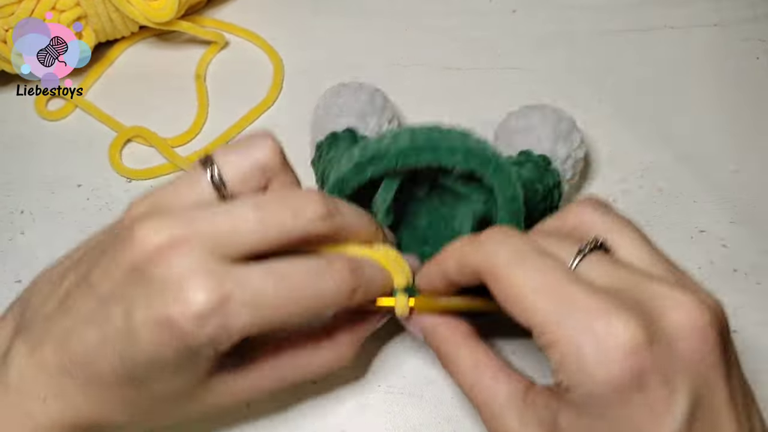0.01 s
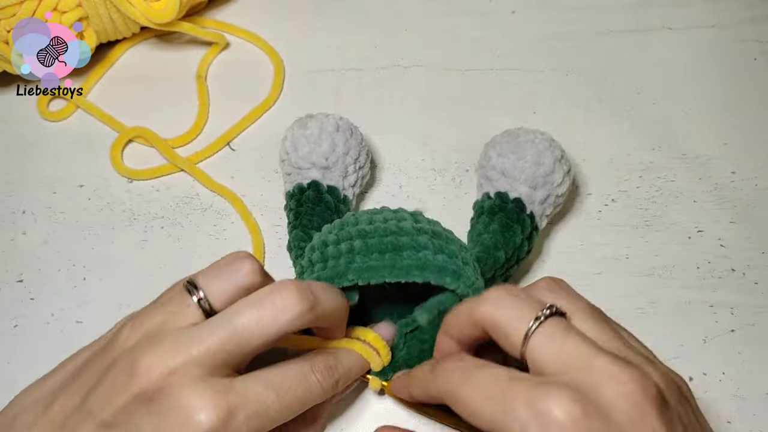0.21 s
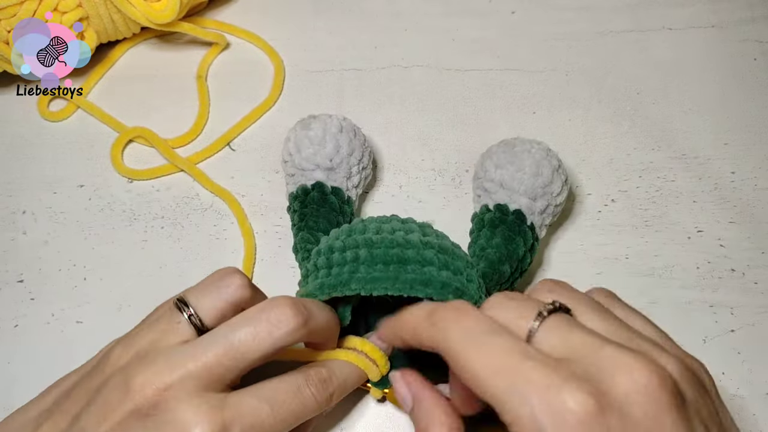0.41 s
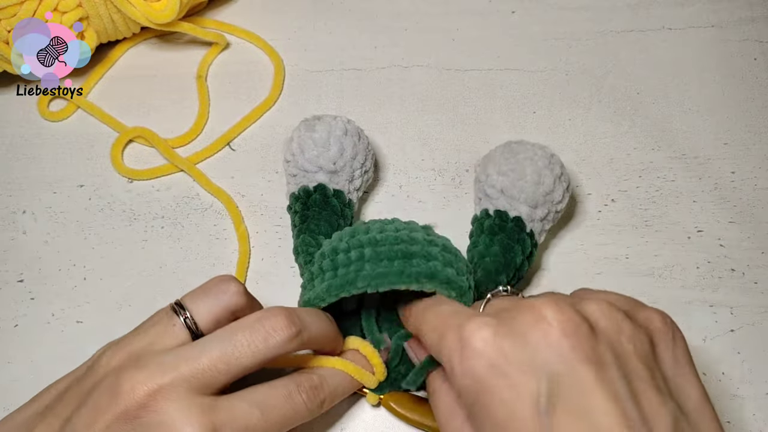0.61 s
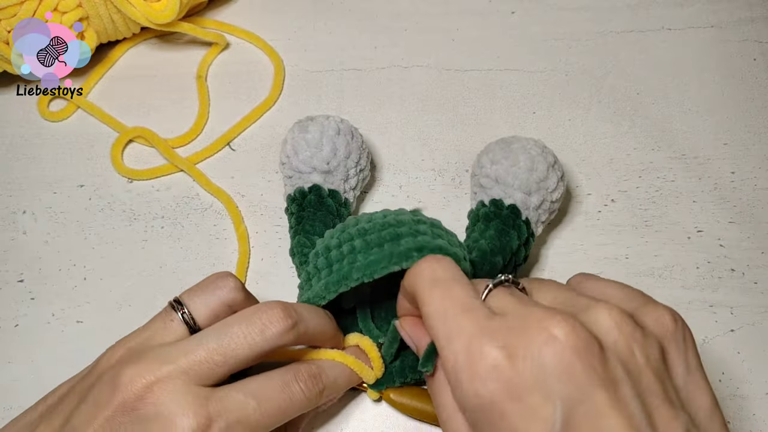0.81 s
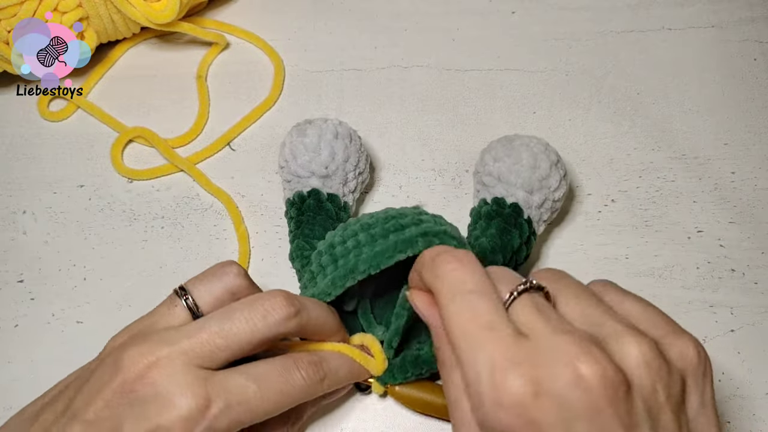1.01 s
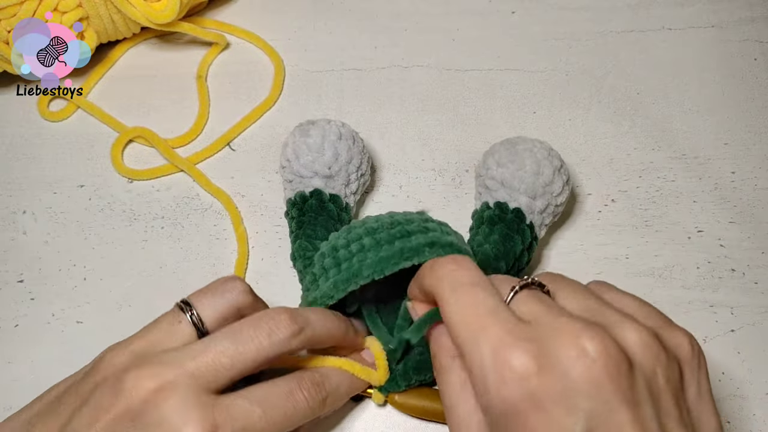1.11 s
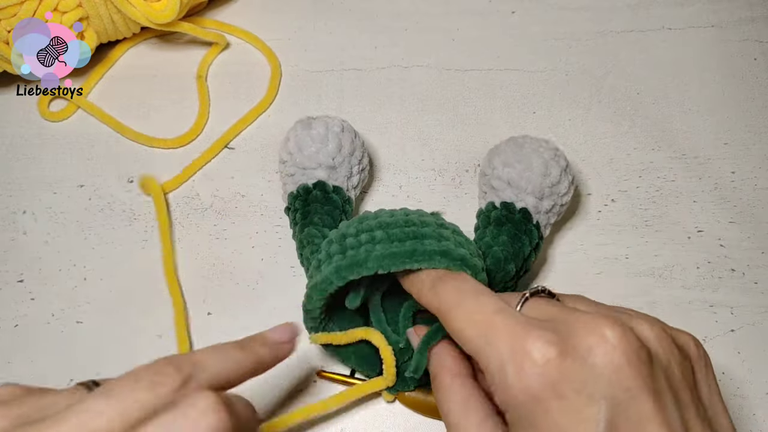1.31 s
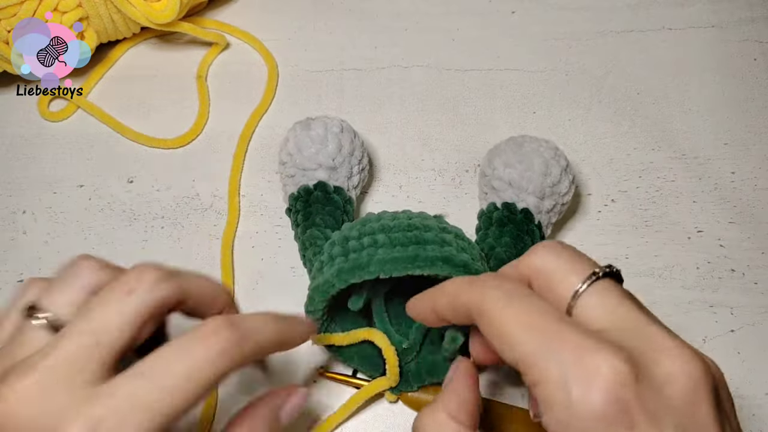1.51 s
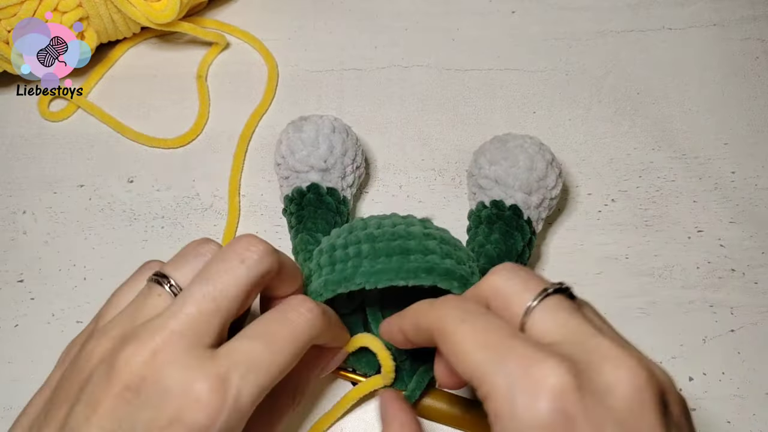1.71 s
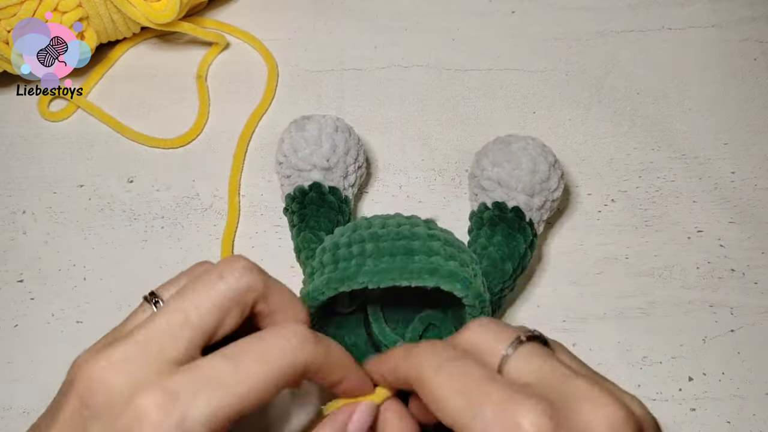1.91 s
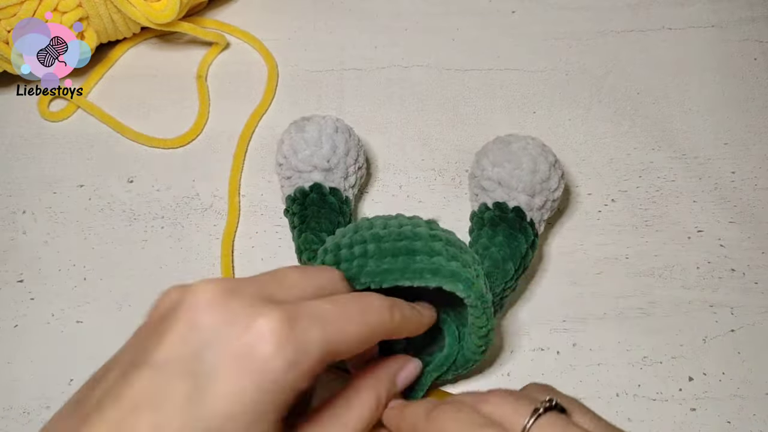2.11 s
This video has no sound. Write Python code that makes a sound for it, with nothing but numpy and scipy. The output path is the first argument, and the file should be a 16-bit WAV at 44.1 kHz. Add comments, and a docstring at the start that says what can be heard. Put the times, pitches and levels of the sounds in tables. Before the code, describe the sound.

A small crochet hook taps a table in a quiet room, miked closely in stereo. Soft low handling thuds open; at 0.24 s a loud, bright clack bounces briefly with a short room tail. Barely audible yarn rustles follow. Faint taps and a scrape come at 1.1-1.3 s, firmer knocks and clicks at 1.73-1.9 s, and a dull tiny tap near 2.07 s, over low hiss and faint hum.

```python
"""In a quiet room, a small crochet hook taps and knocks on a table among soft yarn, near a two-port microphone.
Each tap is a few milliseconds of filtered noise; decaying sines ring as low table modes and high lines in the
tail, and a diffuse noise tail answers as the room. Grainy noise bands are faint rustles, plus louder scrapes,
knocks and a tick beside the taps; low decaying sines are soft thuds of handling and table resonances around the
taps. Narrow noise bands are an appliance's hum, and coloured noise is the rumble and microphone hiss."""
import sys
import numpy as np
from scipy import signal
from scipy.fft import rfft, irfft
from scipy.io import wavfile
from scipy.ndimage import uniform_filter1d

SR = 44100
rng = np.random.default_rng(int(sys.argv[2]) if len(sys.argv) > 2 else 0)


def put_to_file(sound):
    """Save the sound as 16-bit audio at rate SR, in the file named by the first command-line argument."""
    columns = np.atleast_2d(sound).T  # one column per channel
    safe = np.clip(columns, -1, 1)
    whole_steps = np.round(safe * 32767)
    wavfile.write(sys.argv[1], SR, whole_steps.astype(np.int16))


N = 97020  # samples

# Coherence of the two ports in the room's answer and the grainy noises.
# Each row: frequency in Hz, left-right likeness (0-1).
ROOM_COHERENCE = [(60, 0.2), (130, 0.9), (290, 0.92), (640, 0.24), (1400, 0.097), (15000, 0.036)]
# Coherence of the two ports in the hiss and hum. Each row: frequency in Hz, left-right likeness (0-1).
FLOOR_COHERENCE = [(60, 0.32), (240, 0.94), (950, 0.12), (3770, 0.036), (15000, 0.36)]


def taps():
    """Impact excitation: short noise bursts, each with its own spectrum, place and room answer."""
    # Impacts. Each row: start in seconds, depth of the shared colour (0-1), ten band levels in dB,
    # left-right difference in dB, rise constant in seconds, hold in seconds, decay time T60 in seconds,
    # level of the room's answer in dB over the tap, time in seconds at which the answer's extra fade is 1 dB.
    impacts = [(.2446, 0.97, -36, -33.5, -33.5, -35.5, -30, -25.5, -17.5, -17, -16, -17.5, -0.5, 0.00067, 0.0021, 0.011, -6, 0.072),
               (1.1167, 0.9, -53, -50.5, -52, -54, -42.5, -47, -38, -38.5, -37, -44.5, 1.5, 0.0011, 0.0018, 0.033, -9, 0.049),
               (1.2293, 0.29, -46.5, -63, -48, -46, -37, -45.5, -43.5, -54, -65, -58, -2.5, 0.00094, 0.0016, 0.096, -6.5, 0.039),
               (1.2403, 0.54, -59.5, -41, -42.5, -41, -37.5, -46, -38.5, -40.5, -44, -51, 0.5, 0.00021, 0.002, 0.013, -6.5, 0.047),
               (1.7348, .8, -46.5, -49.5, -49.5, -52, -40.5, -44.5, -36, -36.5, -36.5, -38.5, 2, 0.0003, 0.003, 0.041, -6, 0.0427),
               (1.7733, 0.85, -42.5, -30.5, -32, -36.5, -29, -71.5, -29, -56, -73.5, -58, 1, 0.00076, 0.00061, 0.033, -9, 0.053),
               (1.7835, 0.24, -42.5, -42.5, -61, -37, -28.5, -25, -21.5, -22.5, -33, -34.5, -2, 0.00045, 0.0018, 0.022, -13.5, 0.051),
               (1.87, .4, -50, -65, -55, -64, -78, -60, -67, -29, -26.5, -48, 15.5, 0.00024, 0.00027, 0.0089, -32, 0.02),
               (1.8838, 0.32, -71.5, -55, -51, -67.5, -50, -50.5, -50, -48, -52, -59, 14.5, 0.00055, 0.000767, 0.004, -19, 0.072),
               (2.069, 0.76, -58.5, -56.5, -54.5, -55.5, -54.5, -72, -68, -75, -83, -82, 2.5, 0.00046, 0.0039, 0.025, -14, 0.065)]
    # Frequencies of the ten band levels, in Hz.
    bands_hz = [120, 280, 550, 1200, 2500, 4200, 6400, 8500, 10500, 14000]
    # Shared colour of hook, table and microphone. Each row: frequency in Hz, level in dB.
    shared_colour = [(70, -20), (120, -4.5), (175, -15.5), (275, -1), (420, -15.5), (620, -4.5), (900, -10),
                     (1250, -1), (1700, -9.5), (2800, -2.5), (3230, -17), (3550, -4), (4200, -1.5),
                     (4650, -3), (4870, -12.5), (5250, -12), (5600, -10.5), (6250, 0), (7100, -4),
                     (8400, -1), (9200, -5.5), (10600, -10.5), (12200, -13.5), (15000, -12.5), (16800, -48)]
    # The first tap is a drop and bounces. Each row: delay in seconds, level in dB over the tap.
    bounces = [(.004, -8.5), (.017, -7), (.029, -16.5), (.039, -13)]
    lag_s, thin_hz = 0.00024, 260  # lateness of the left port, corner of the rattle's high-pass
    common = 0.6  # amplitude share of noise common to both ports
    out = np.zeros((2, N))
    t = np.arange(4096) / SR
    for k, (start, depth, *levels_db, pan_db, rise, hold, t60, room_db, fade_s) in enumerate(impacts):
        bands = list(zip(bands_hz, levels_db))
        colour = lambda hz: amp(depth * along(shared_colour, hz) + along(bands, hz)) / np.sqrt(hz + 1)
        high_pass = lambda hz: (1j * hz / (thin_hz + 1j * hz)) ** 2
        level = np.sqrt(np.sum(amp(levels_db) ** 2))
        sides = opposed(pan_db)
        shape = (1 - np.exp(-(t / rise) ** 2)) * amp(-60 * np.maximum(t - hold, 0) / t60)
        strikes = [(0, 0.013)] + (bounces if k == 0 else [])
        for delay, db in strikes:
            noise = rng.standard_normal((3, len(t)))
            noise = common * noise[0] + np.sqrt(1 - common ** 2) * noise[1:]
            rattle = filtered(noise, colour) * shape
            # equal energy at both ports before the high-pass and the panning
            rattle *= level * np.linalg.norm(shape) / np.linalg.norm(rattle, axis=1, keepdims=True)
            left, right = amp(db) * sides * filtered(rattle, high_pass)
            add(out, np.array([np.roll(left, round(lag_s * SR)), right]), start + delay)
        add(out, level * amp(room_db) * sides * room_answer(colour, fade_s), start)
        add(out, amp(room_db) * modal_ring(bands, fade_s), start)
    return out


def modal_ring(bands, fade_s):
    """Modal decay: low table modes in phase at both ports, high lines with a random phase at each."""
    # Table modes. Each row: frequency in Hz, level in dB over the tap's band, decay time T60 in seconds.
    table_modes = [(120, 1, 0.4), (275.6, -1.5, 0.2), (357.6, -2.5, 0.23), (489.4, 4, 0.25),
                   (606, -0.5, 0.26), (645.4, -5.5, 0.28), (1180, -6, 0.13)]
    # High ringing lines in the tail, of room or struck objects.
    # Each row: frequency in Hz, level in dB over the tap's band.
    high_lines = [(2725, -6), (4143, -1), (6503, -11), (8200, -11), (8522, -7)]
    high_t60, swell_s = 0.3, 0.0027  # decay time of the high lines, rise constant of the whole ring
    t = np.arange(SR // 3) / SR

    def mode(hz, db, t60, cycles):
        """A damped sinusoid with a random spread of level; cycles is its starting phase."""
        level_db = db + along(bands, hz) + rng.normal(0, 0.58)
        return amp(level_db - 60 * t / t60) * np.sin(2 * np.pi * (hz * t + cycles))

    low_ring = sum(mode(hz, db, t60, rng.random()) for hz, db, t60 in table_modes)
    high_ring = sum(mode(hz, db, high_t60, rng.random((2, 1))) for hz, db in high_lines)
    return (low_ring + high_ring) * (1 - np.exp(-t / swell_s)) * amp(-(t / fade_s / 2) ** 3)


def room_answer(colour, fade_s):
    """Diffuse reverberation: noise decaying at a rate set by frequency, its end falling ever faster."""
    # Reverberation. Each row: frequency in Hz, decay time T60 in seconds.
    reverberation = [(120, 0.87), (400, 0.35), (1500, 0.61), (4200, 0.45), (8000, 0.36), (11000, 0.3),
                     (15500, 0.24)]
    build_s, echoes_db = 0.014, 1.3  # build-up constant, roughness from separate echoes
    hz, t, z = signal.stft(pair(SR // 2, colour, ROOM_COHERENCE), SR, nperseg=256)
    decay = amp(-60 * t / along(reverberation, hz)[:, None])
    tail = signal.istft(z * decay, SR, nperseg=256)[1]
    t = np.arange(tail.shape[1]) / SR
    echoes = amp(echoes_db * (unit(uniform_filter1d(rng.standard_normal(len(t)), size=90)) - .5))
    return tail * echoes * (1 - np.exp(-(t / build_s) ** 2)) * amp(-(t / fade_s) ** 3)


def grainy_noises():
    """Band-shaped noise bursts: faint rustles, plus louder scrapes, knocks and a tick beside the taps."""
    # Bursts. Each row: start in seconds, time constant of the swell in seconds, nominal level in dB,
    # centre in Hz, half-width in octaves (to 1/e in amplitude).
    bursts = [(0.025, 0.081, -64.5, 8350, 0.85), (0.021, 0.088, -66.5, 465, 1.5),
              (0.484, 0.053, -66, 2235, 1.6), (0.615, 0.032, -66.5, 2020, 1.2),
              (0.828, 0.05, -64, 2820, 1.9), (0.961, 0.041, -61.5, 8100, 0.58),
              (0.985, 0.021, -65.5, 700, 2.1), (1.249, 0.033, -42, 993, 1.7),
              (1.27, 0.015, -38.5, 900, 1.1), (1.715, 0.037, -51.5, 594, 1.32),
              (1.796, 0.031, -41.5, 527, 1.16), (1.905, 0.11, -69, 2500, 0.96),
              (2.075, 0.0052, -59.5, 4500, .9), (2.094, 0.026, -64.5, 1000, 1.24)]
    # Resonances that rubbing excites. Each row: frequency in Hz, half-width in Hz, gain over the burst.
    resonances = [(2010, 58, 3.3), (2960, 130, 1.1)]
    grain_db = 1.5  # rms fluctuation of level
    out = np.zeros((2, N))
    for start, length, db, hz, octaves in bursts:
        def spectrum(f):
            """A bell on the octave scale times the resonances."""
            lift = 1 + sum(gain / (1 + ((f - centre) / width) ** 2) for centre, width, gain in resonances)
            return lift * np.exp(-(np.log2((f + 1) / hz) / octaves) ** 2)

        noise = pair(8192, spectrum, ROOM_COHERENCE)
        grain = amp(grain_db * unit(uniform_filter1d(rng.standard_normal(8192), size=120)))
        u = np.arange(8192) / SR / length
        swell = u * np.exp(1 - u) * np.exp(-(u / 1.66) ** 4)
        add(out, amp(db) * unit(noise * grain) * swell, start)
    return out


def low_thuds():
    """Damped oscillation: soft thuds of handling, and table resonances ringing around the taps."""
    # Thuds and resonances. Each row: start in seconds, nominal peak in dB, frequency in Hz,
    # decay time T60 in seconds, left-right difference in dB.
    thuds = [(0.031, -28.5, 95.5, 0.056, -2), (0.043, -36, 54, 0.088, 1), (0.049, -32.5, 139, 0.074, 2),
             (0.092, -44, 127, 0.14, 2), (0.114, -43, 91, 0.085, 3), (0.297, -39.5, 120, 0.4, 2.5),
             (1.3, -48, 122.6, 0.18, -1), (1.28, -50.5, 34.8, 0.29, 20), (1.727, -40.5, 364.7, 0.23, 4),
             (1.792, -46.5, 40, 0.18, 13), (1.86, -44, 44.9, 0.1, 7), (2.11, -51.5, 54, 0.11, -9)]
    out = np.zeros((2, N))
    t = np.arange(SR // 4) / SR
    onset = 1 - np.exp(-(t / 0.0045) ** 2)
    for start, db, hz, t60, pan_db in thuds:
        ring = -np.sin(2 * np.pi * hz * t) * onset * amp(db - 60 * t / t60)
        add(out, ring * opposed(pan_db), start)
    return out


def hum():
    """Narrow-band noise: an appliance's slightly unsteady hum lines; the lowest swells and sinks."""
    # Hum lines. Each row: frequency in Hz, level in dB over the line's level below, half-width in Hz.
    hum_lines = [(120.5, 1, 2.5), (857, -12, 5), (1199, -11, 4)]
    # Course of the lowest line. Each row: time in seconds, level in dB.
    low_level = [(0, -51), (.2, -75), (.46, -72), (.55, -78), (.62, -65.5), (.92, -66), (.96, -69.5),
                 (1.1, -69.5), (1.4, -69.5), (1.94, -70.5), (2.2, -66.5)]
    upper_db = -65.5  # level of the upper lines
    lines = []
    for hz, db, width in hum_lines:
        line = pair(N, lambda f: 1 / (1 + ((f - hz) / width) ** 2), FLOOR_COHERENCE)
        steadied = line / (np.abs(signal.hilbert(line)) + 1.1)  # compresses the envelope
        lines.append(amp(db) * unit(steadied))
    low, *upper = lines
    return amp(np.interp(np.arange(N) / SR, *np.transpose(low_level))) * low + amp(upper_db) * sum(upper)


def hiss():
    """Coloured noise under a slow gain: microphone hiss and room rumble, patchy in its lower part."""
    # Noise spectrum. Each row: frequency in Hz, relative level in dB per Hz.
    hiss_spectrum = [(15, -2), (45, -8.5), (90, -19), (150, -21), (250, -20.5), (500, -25.5), (900, -28),
                     (1350, -32), (1650, -35.5), (2300, -36.5), (4500, -40), (7350, -36.5), (7750, -24.5),
                     (9300, -31.5), (10400, -40), (11500, -37), (12500, -41.5), (15600, -44), (16000, -80)]
    # Course of the noise. Each row: time in seconds, level in dB over the base level.
    hiss_level = [(0, 7), (.2, 1.5), (1.4, 3), (1.5, -0.5), (1.7, 0.5), (2.2, 3)]
    base_db = -60.5
    noise = pair(N, lambda hz: amp(along(hiss_spectrum, hz)), FLOOR_COHERENCE)
    level_db = base_db + np.interp(np.arange(N) / SR, *np.transpose(hiss_level))
    return amp(level_db) * patchy(noise, hz_top=1513)


def patchy(x, hz_top):
    """Random modulation in time and frequency: patches of gain that weaken above hz_top."""
    patch_db = 3  # rms gain of the patches at the lowest frequencies
    hz, t, z = signal.stft(x, SR, nperseg=1024)
    field = rng.standard_normal(z.shape[1:])
    field = unit(uniform_filter1d(uniform_filter1d(field, size=5, axis=0), size=4, axis=1))
    gain = amp(patch_db * field / (1 + (hz[:, None] / hz_top) ** 2))
    return signal.istft(z * gain, SR, nperseg=1024)[1][:, :N]


def amp(db):
    """Decibel law: amplitude ratio of a level in dB."""
    return 10 ** (np.asarray(db) / 20)


def opposed(pan_db):
    """Level difference between ports: half of it raises the left gain, half lowers the right."""
    return amp([[pan_db / 2], [-pan_db / 2]])


def unit(x):
    """Normalisation to a root-mean-square of 1."""
    return x / np.sqrt(np.mean(x ** 2) + 1e-20)


def along(points, hz):
    """Interpolation of (Hz, value) points on a logarithmic frequency axis."""
    f, v = np.transpose(points)
    return np.interp(np.log(hz + 1), np.log(f + 1), v)


def filtered(x, response):
    """Linear filtering: the spectrum of x times a response of frequency."""
    n = x.shape[-1]
    return irfft(rfft(x) * response(np.fft.rfftfreq(n, 1 / SR)), n)


def pair(size, gain, alike):
    """Partial coherence: stereo noise of rms 1 whose mid-side balance sets the likeness of the ports."""
    turn = lambda hz: np.arccos(np.clip(along(alike, hz), -1, 1)) / 2
    mid_side = lambda hz: gain(hz) * [np.cos(turn(hz)), np.sin(turn(hz))]
    mid, side = filtered(rng.standard_normal((2, size)), mid_side)
    return unit(np.array([mid + side, mid - side]))


def add(out, x, start):
    """Superposition: mix x into out from start in seconds, cut at the end."""
    part = out[:, round(start * SR):][:, :x.shape[1]]
    part += x[:, :part.shape[1]]


def scene():
    """Superposition of all sources; the two ports hear the near taps unequally over frequency."""
    # Port inequality for near sounds. Each row: frequency in Hz, left-right difference in dB.
    port_difference = [(2400, -0.5), (4400, -0.5), (8100, -4), (11000, 5), (15000, 6.5)]
    near = filtered(taps(), lambda hz: opposed(1) ** along(port_difference, hz))
    return near + grainy_noises() + low_thuds() + hum() + hiss()


def record(dry):
    """Band limitation: nothing is kept from 16800 Hz up."""
    return filtered(dry, lambda hz: hz < 16800)


dry = scene()
out = record(dry)
put_to_file(out)
```